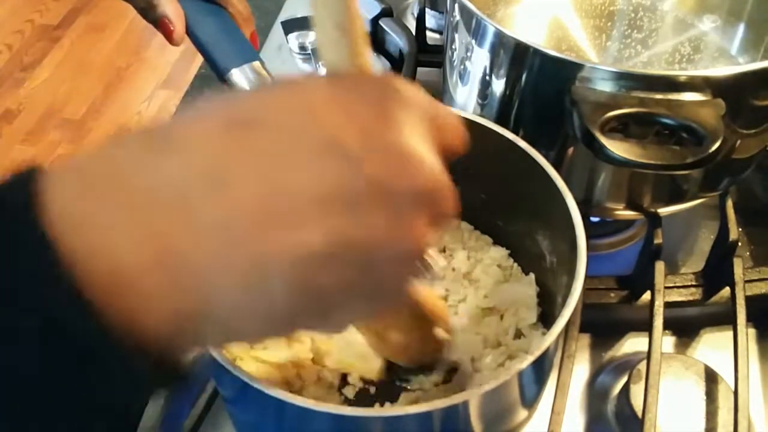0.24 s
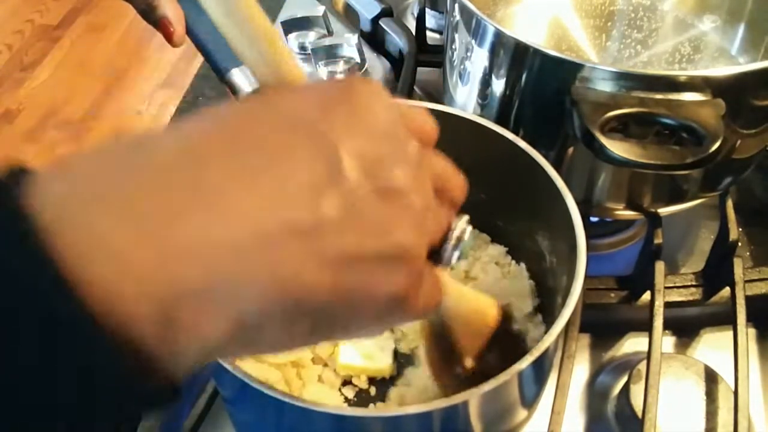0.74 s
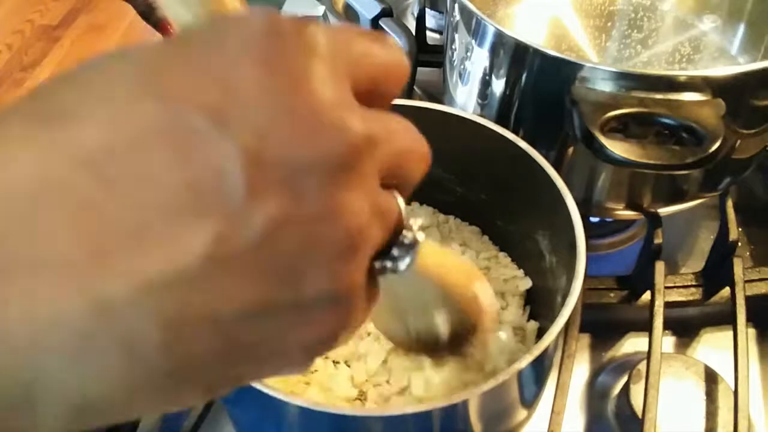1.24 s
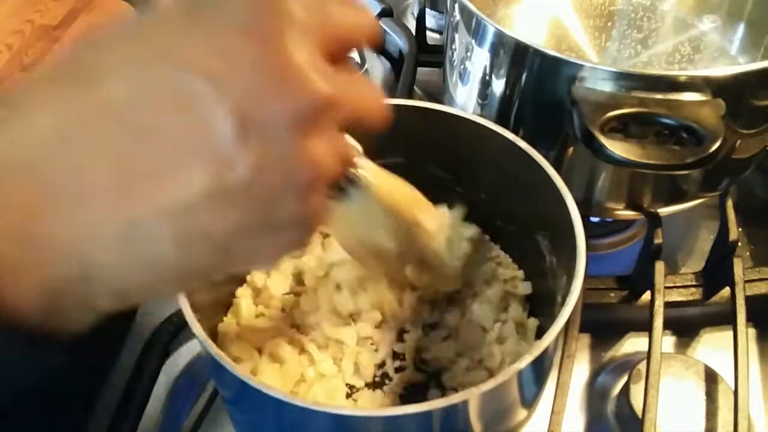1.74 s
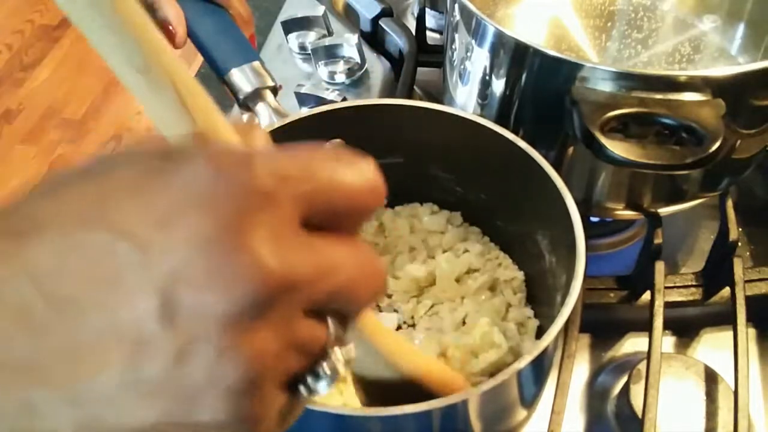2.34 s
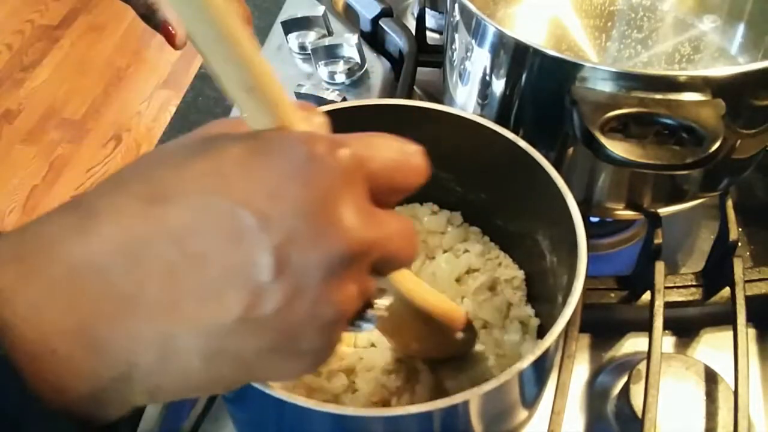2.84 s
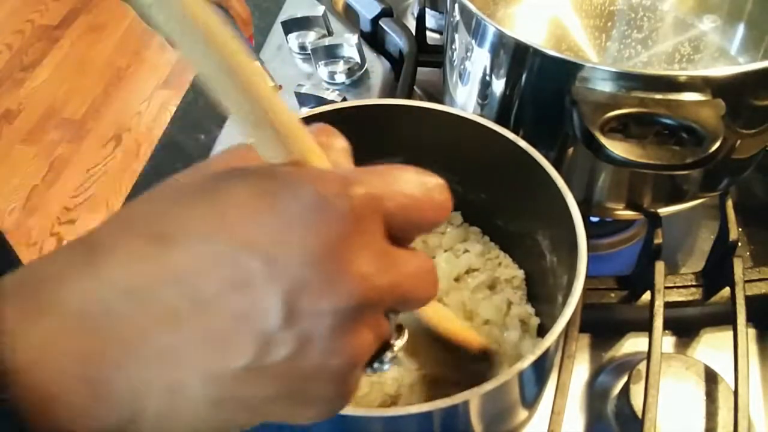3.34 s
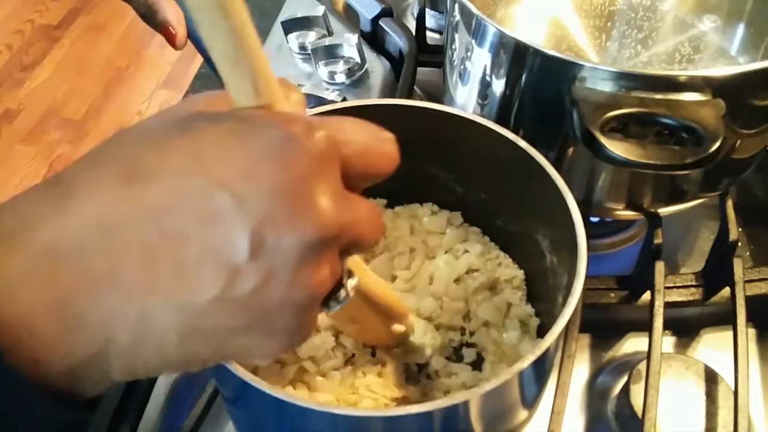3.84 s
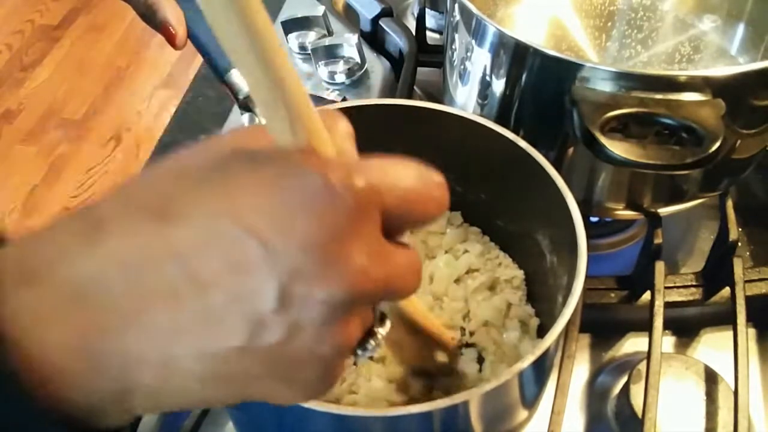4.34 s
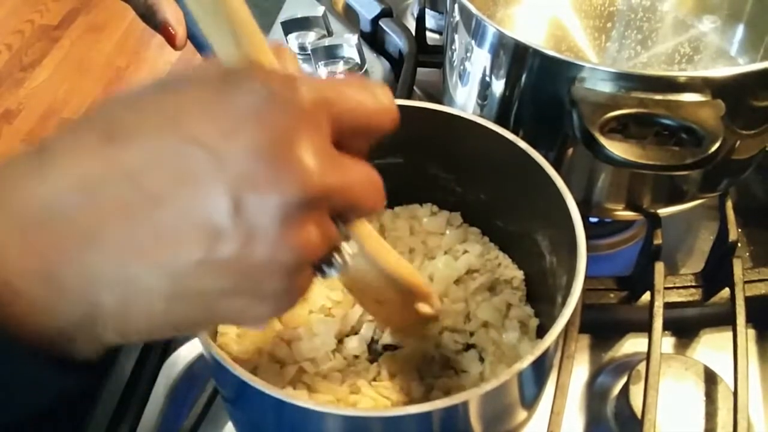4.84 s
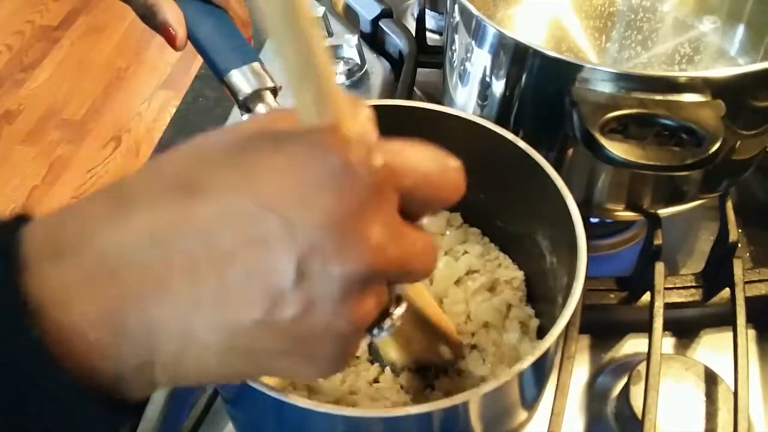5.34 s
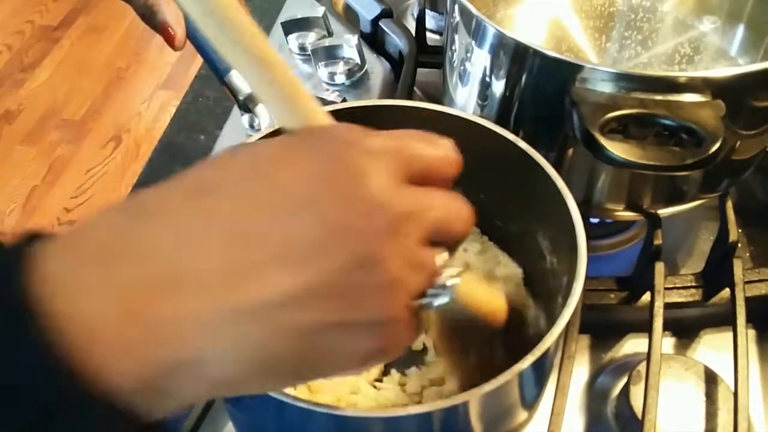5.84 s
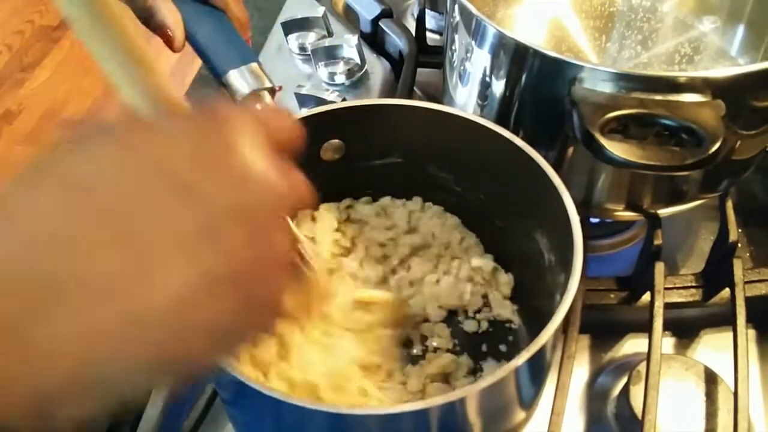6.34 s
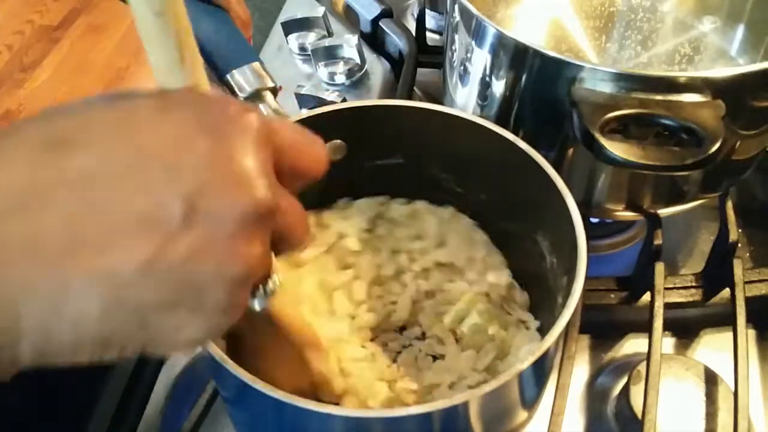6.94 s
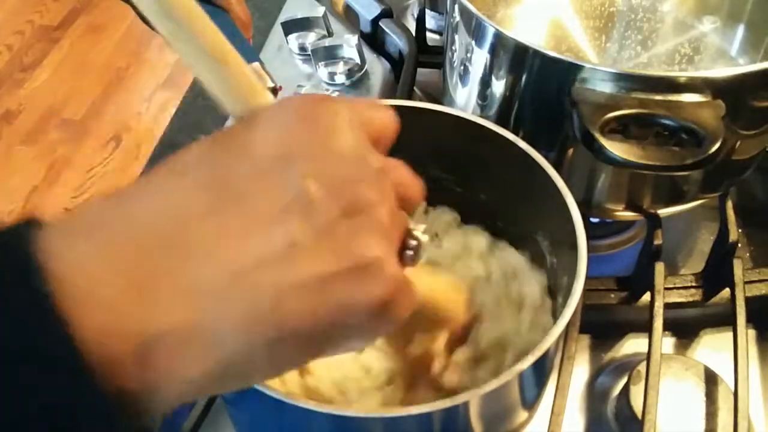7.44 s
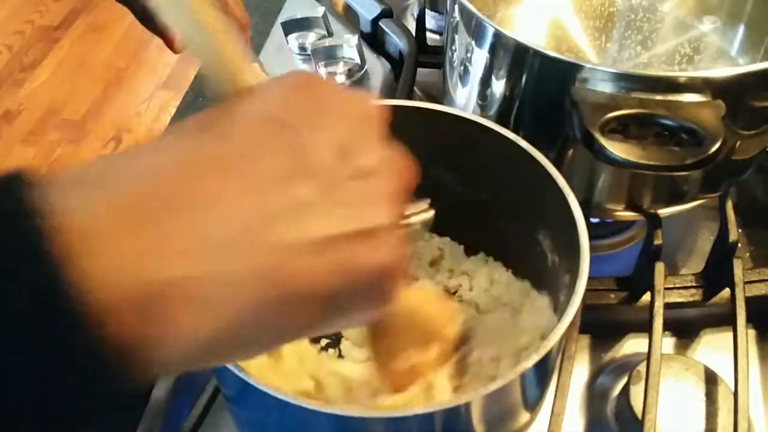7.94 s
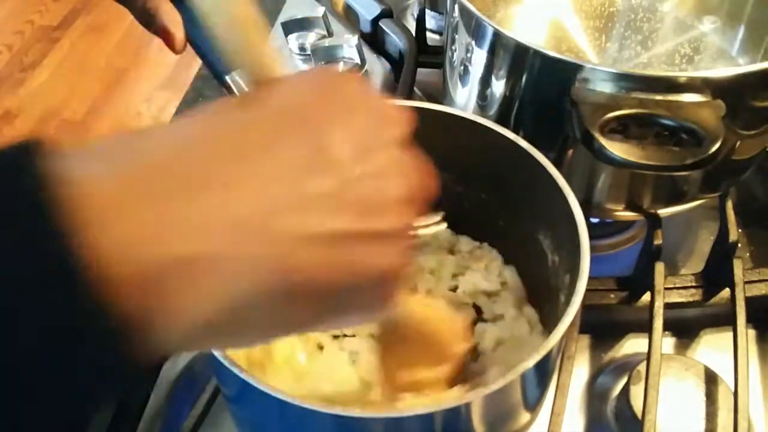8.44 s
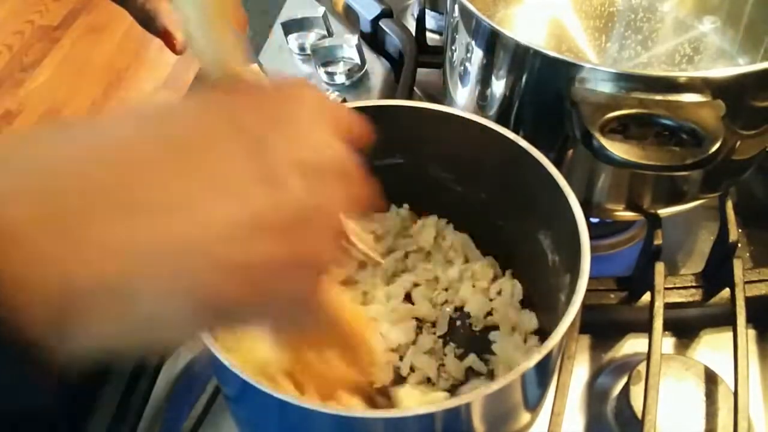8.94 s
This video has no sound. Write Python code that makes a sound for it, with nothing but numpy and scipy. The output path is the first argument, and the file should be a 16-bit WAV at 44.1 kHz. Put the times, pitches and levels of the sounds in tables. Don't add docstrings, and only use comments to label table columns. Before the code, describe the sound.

Close stereo over a saucepan on a gas stove in a small kitchen. A wooden spoon drags lightly through thick frying food with a hard early knock and spitting fat. From about 2.5 to 6 seconds, irregular firm blows clunk on the damped pan, echoing briefly off near walls. Then long scraping strokes turn the food and the sizzle swells, over steady low burner rumble.

```python
import sys
import numpy as np
from scipy import signal
from scipy.io import wavfile
from scipy.ndimage import uniform_filter1d

SR = 44100
rng = np.random.default_rng(int(sys.argv[2]) if len(sys.argv) > 2 else 0)


def to_wav(s):
    ch = np.atleast_2d(s).T
    pcm = np.round(np.clip(ch, -1, 1) * 32767)
    wavfile.write(sys.argv[1], SR, pcm.astype(np.int16))


def ratio_of_db(decibels):
    return 10 ** (np.asarray(decibels, float) / 20)


N = 404838
SWELL_STEP = 32


def evened(x):
    return x / np.sqrt(np.mean(x ** 2) + 1e-20)


def wander(samples, shape=N):
    return evened(uniform_filter1d(rng.standard_normal(shape), samples))


def read(points, hz):
    f, value = np.transpose(points)
    return np.interp(np.log(hz + 1), np.log(f + 1), value)


def curve(rows):
    s, *columns = np.transpose(rows)
    return np.array([np.interp(np.arange(N) / SR, s, c) for c in columns])


def coloured(x, points):
    log_gain = np.log(ratio_of_db(read(points, abs(np.fft.fftfreq(4096, 1 / SR)))))
    taps = np.fft.ifft(np.exp(np.conj(signal.hilbert(log_gain)))).real[:2048]
    return signal.oaconvolve(x, taps / np.linalg.norm(taps))[:N]


def grains(per_s, spread_db):
    size_db = spread_db * np.minimum(rng.exponential(1, N), 4)
    size = ratio_of_db(size_db) * rng.choice([-1., 1.], N)
    return evened(size * (rng.random(N) < per_s / SR))


def patches_of(noise, bins):
    return evened(uniform_filter1d(uniform_filter1d(noise, 6, 0), bins, 1))


def patchy(patchy_db):
    a, b, patches = rng.standard_normal((N // 128 + 5, 257, 3)).T
    z = (a + 1j * b) * ratio_of_db(patchy_db * patches_of(patches, 16))
    return evened(signal.istft(z, nperseg=512, noverlap=384)[1][:N])


def swells(s, rise, fall):
    s, rise, fall = [np.reshape(column, (-1, 1)) for column in (s, rise, fall)]
    late = np.arange(0, N + SWELL_STEP, SWELL_STEP) / SR - s
    return -15.5 * np.where(late < 0, -late / rise, late / fall) ** 1.3


def summed(below_db, top_db):
    power = ratio_of_db(below_db + np.reshape(top_db, (-1, 1))) ** 2
    return np.repeat(np.sqrt(power.sum(0)), SWELL_STEP)[:N]


# (frequency [Hz], level [dB per Hz])
HUM = [(15, -41), (25, 12.5), (48, 2.5), (113, 0.5), (235, -13.5), (262, -18), (342, -8.5), (408, -18),
       (499, -11), (665, -7.5), (711, -7), (907, -18), (1610, -26.5), (1890, -27), (5000, -31), (6500, -29),
       (11000, -120)]
# (frequency [Hz], left-right likeness [-1 to 1])
LIKENESS = [(60, 0.94), (180, 0.83), (550, 0.19), (1650, -0.3), (4970, 0.067), (15000, -0.01)]
# (time [s], rise [s], fall [s], drone level [dB])
FLARES = [
    (.89, .9, 0.096, -48),
    (2.91, 3.2, 0.13, -55.5),
    (4.42, 0.066, 0.29, -61),
    (5.498, 0.037, 0.35, -47),
    (6.5, 0.68, 0.53, -44),
    (7.8, 1.7, 1.6, -51.5),
]


def burner_and_kitchen():
    frames, hz = N // 512 + 5, np.fft.rfftfreq(2048, 1 / SR)
    a, b, c, d, patches = rng.standard_normal((frames, 1025, 5)).T
    same = np.clip(read(LIKENESS, hz), -1, 1)[:, None]
    left = a + 1j * b
    z = np.array([left, same * left + np.sqrt(1 - same ** 2) * (c + 1j * d)])
    z *= ratio_of_db(read(HUM, hz)[:, None] + 2.7 * patches_of(patches, 8))
    roar = evened(signal.istft(z, nperseg=2048, noverlap=1536)[1][:, :N])

    roar_db, drone_db, drone_hz, drone_width_hz = -51.5, -65, 65.3, 11
    s, rise, fall, db = np.transpose(FLARES)
    flare = np.hypot(1, summed(swells(s, rise, fall), db - drone_db))
    pole = np.exp((2j * np.pi * drone_hz - np.pi * drone_width_hz) / SR)
    drone = evened(signal.lfilter([1], np.poly([pole, pole]), rng.standard_normal(N)).real)
    flame = ratio_of_db(roar_db) * flare ** 0.078 * roar + ratio_of_db(drone_db - 3.0) * flare * drone
    return ratio_of_db([[1.5], [0]]) * flame


# (time [s], rise [s], fall [s], level [dB], pitch [Hz], sag [Hz per s])
RINGS = [
    (0.82, .1, 0.4, -51, 735, 92.5),
    (0.75, .25, .25, -61, 850, -20),
    (1.3, 0.17, 0.18, -63, 800, 6),
    (2.1, 0.45, 0.42, -64.5, 718, -6.5),
    (1.35, 0.36, 0.36, -66.5, 338, 5.5),
    (3.3, 0.33, .2, -69, 310, 3),
    (2.72, 0.17, .12, -64, 356, 30),
]


def singing_stove():
    s, rise, fall, db, hz, sag = np.transpose(RINGS)[:, :, None]
    late = np.arange(N) / SR - s
    gain = np.repeat(ratio_of_db(swells(s, rise, fall) + db), SWELL_STEP, axis=1)[:, :N]
    waver = ratio_of_db(6 * wander(1500, (len(s), N)))
    tone = np.sin(2 * np.pi * (hz * late - sag * late ** 2 / 2))
    return np.sqrt(2) * (gain * waver * tone).sum(0)


# (frequency [Hz], width [Hz], level [dB])
POT = [(1385, 87, -15), (2270, 210, -16), (2630, 110, -6), (3030, 150, -12.5), (3317, 120, -8),
       (3596, 52, -5), (3923, 340, -2.5), (4636, 370, -3), (5200, 250, -8), (5460, 260, -6),
       (5840, 250, -38), (6407, 114, 2.5), (6660, 47, 4.5), (6780, 60, 3)]


def pot(x):
    taps = np.zeros(4096)
    for k, (hz, width, db) in enumerate(POT):
        p = np.exp((2j * np.pi * hz - np.pi * width) / SR)
        mode = signal.lfilter([(1 - abs(p)) ** 2], np.poly([p, p]), signal.unit_impulse(4096)).real
        taps += (-1) ** k * ratio_of_db(db) * mode
    return ratio_of_db(5) * signal.oaconvolve(x, taps)[:N]


# (time [s], sizzle level [dB], top treble [dB])
HEAT = [(0, -52.5, 6), (.46, -54.5, 6.5), (1.1, -51.5, 7.5), (1.5, -49.5, 0), (1.84, -53.5, 17),
        (2.02, -52, 9), (2.22, -59, -1), (2.7, -57, 0), (3.22, -60, 4.5), (3.45, -52.5, 5), (4.2, -53, 2.5),
        (5.06, -52.5, 9), (5.63, -53, 8.5), (6.2, -52, 5.5), (7.3, -45, -0.5), (7.6, -65, -4),
        (8.3, -43.5, 1), (9.18, -44.5, -1)]
# (time [s], rise [s], fall [s], sizzle level [dB], slosh level [dB])
TURNS = [(.23, 0.17, 0.18, -53, -55), (.84, 0.19, 0.058, -45, -43.5), (1.2, 0.08, 0.026, -45.5, -48),
         (1.69, 0.29, 0.024, -50, -48), (2.07, 0.065, 0.19, -48.5, -51), (2.561, 0.014, 0.045, -46, -40),
         (2.89, 0.077, 0.07, -48.5, -58), (2.99, 0.089, 0.032, -50.5, -49), (3.37, 0.068, 0.15, -52.5, -52),
         (4.239, 0.014, 0.18, -48, -58.5), (4.52, 0.02, 0.033, -52, -71), (4.65, 0.057, 0.094, -51, -57),
         (5.089, 0.017, 0.011, -44, -57), (5.16, .05, .15, -47.5, -56), (5.471, 0.0071, .08, -55, -52),
         (6.03, 0.17, 0.088, -41, -43), (6.49, 0.15, 0.053, -40, -43), (6.67, 0.15, 0.04, -44, -46.5),
         (7.21, 0.61, 0.39, -37, -43.5), (7.44, 0.79, 0.17, -37, -43.5), (7.898, 0.5, 0.22, -37.5, -43),
         (8.13, 0.091, 0.012, -41.5, -54), (8.42, 0.38, 0.52, -42.5, -44.5),
         (8.85, 0.16, 0.83, -39.5, -43.5)]
# (time [s], peak level [dB])
SPITS = [(0.021, -28), (0.046, -34), (0.134, -38), (0.4765, -41), (1.61, -36), (1.806, -41), (1.822, -42),
         (1.843, -42), (1.905, -51), (1.941, -37), (2.5554, -27), (2.8838, -39), (3.276, -39),
         (3.7315, -44), (4.5184, -29.5), (5.7653, -45), (3.6047, -39), (3.878, -33), (4.039, -32.5),
         (4.06, -37), (4.233, -32), (4.2676, -30), (4.471, -40), (4.504, -33.5), (4.601, -34), (4.795, -39),
         (5.0735, -31), (5.259, -35), (5.273, -33), (5.3654, -32), (5.465, -34), (5.8648, -34),
         (6.3036, -32), (6.6174, -26), (6.6608, -43), (6.8183, -30), (6.841, -30), (6.983, -23),
         (8.917, -24.5)]
# (frequency [Hz], level [dB])
LEFT_PORT = [(1500, -40), (3300, -30), (5000, -19.5), (6800, -14.5), (8200, -9.5), (9000, -19), (10000, -1),
             (11000, 5.5), (12000, -5.5), (13500, -5), (14800, -12), (16000, -4.5)]
# (frequency [Hz], level [dB])
RIGHT_PORT = [(1500, -27), (3300, -26.5), (5000, -17), (6000, -12.5), (7100, -2.5), (8000, -3), (8700, -17),
              (9200, -21), (10000, -50), (12000, -21.5), (14500, -23), (16000, -14)]


def frying():
    wet_db, drag_db = -21.5, -10.5
    heat_db, treble_db = curve(HEAT)
    heat = ratio_of_db(heat_db)
    s, rise, fall, fizz_db, slosh_db = np.transpose(TURNS)
    turned = swells(s, rise, fall)
    sizzle = np.hypot(heat, summed(turned, fizz_db))
    wet = np.hypot(ratio_of_db(wet_db) * heat, summed(turned, slosh_db))
    s, rise, fall, db = np.transpose(STROKES)[:4]
    wet = np.hypot(wet, summed(swells(s, rise, fall), db + drag_db))
    flicker = ratio_of_db(0.95 * wander(300))

    s, db = np.transpose(SPITS)
    spits = np.zeros(N)
    spits[np.round(s * SR).astype(int)] = ratio_of_db(db - 6.5)
    t = np.arange(600) / SR
    spit_fall = ratio_of_db(-60 * t / 0.035)

    crackle = grains(300, 4.4)
    out = []
    for port, port_db in ((LEFT_PORT, 5), (RIGHT_PORT, -3)):
        fizz = sizzle * flicker * (patchy(2.4) + 0.29 * crackle)
        burst = signal.oaconvolve(spits, rng.standard_normal(len(t)) * spit_fall)[:N]
        slosh = ratio_of_db(0.5) * wet * flicker * patchy(4.2)
        out.append(ratio_of_db(port_db) * coloured(fizz + burst, port) + ratio_of_db(8) * pot(slosh))
    highpass = signal.butter(N=3, Wn=12200, btype="high", fs=SR, output="sos")
    top = signal.sosfiltfilt(highpass, out)
    return out + (ratio_of_db(treble_db) - 1) * top


def rung(modes, at, pushes, rise_s):
    skirt_low, skirt_high = 0.54, 2.64
    out = np.zeros((2, N))
    for (hz, db, t60, lr_db, lead), push in zip(modes, pushes):
        fall = np.exp((2j * np.pi * hz - np.log(1000) / t60) / SR)
        rise = np.exp((2j * np.pi * hz - hz / 600 / rise_s) / SR)
        band = signal.butter(N=2, Wn=[skirt_low * hz, skirt_high * hz], btype="band", fs=SR, output="sos")
        force = signal.sosfilt(band, np.bincount(at, push, N))
        gain = ratio_of_db(db) * (1 - abs(rise)) ** 2
        ring = signal.lfilter([1j * gain], np.poly([fall, rise, rise]), force)
        port = ratio_of_db(lr_db / 2) * np.exp(.5j * lead)
        out += (ring * port ** np.array([[1], [-1]])).real
    return out


ZONES_HZ = [
    250,
    600,
    930,
    1800,
]


def zone_db(hz, thud_db, wall_db, rim_db):
    share = [np.interp(np.log(hz), np.log(ZONES_HZ), row) for row in np.eye(4)]
    return share[0] * thud_db + share[2] * wall_db + share[3] * rim_db


# (time of top [s], rise [s], fall [s], pressure [dB], wall against base [dB])
STROKES = [(0.225, 0.033, 0.041, -41, -7), (0.819, 0.055, 0.022, -36, -1.5), (1.165, 0.018, 0.054, -41, -8),
           (1.658, 0.1, 0.1, -53.5, 1.5), (2.08, 0.071, 0.12, -53, 1), (2.9, 0.079, 0.022, -48, -2),
           (2.991, 0.046, 0.0077, -44, -2.5), (5.964, 0.0083, 0.034, -29, -10), (6.49, 0.1, 0.05, -50, 3),
           (7.08, 0.053, 0.19, -37, -5.5), (7.185, 0.19, 0.062, -35.5, -3.5),
           (7.39, 0.071, 0.083, -41, 0.5), (7.455, 0.077, 0.028, -39.5, 3), (7.629, 0.092, 0.081, -39, 5.5),
           (7.884, 0.19, 0.029, -39.5, 0), (8.108, 0.051, 0.084, -30, -4.5), (8.313, 0.069, 0.044, -35, -3),
           (8.585, 0.097, 0.12, -38, 0), (8.801, 0.068, 0.08, -38, 2), (8.844, 0.086, 0.037, -34.5, -10),
           (9.04, 0.097, 0.097, -37, -4), (9.131, 0.11, 0.04, -38, -4)]


def scrapes():
    s, rise, fall, db, wall_db = np.transpose(STROKES)
    below_db = swells(s, rise, fall)
    now = np.argmax(below_db + db[:, None], 0)
    eased_db = np.minimum(-below_db[now, np.arange(len(now))], 30)
    rim_db = np.repeat(-6 + 0.93 * wall_db[now] + 0.27 * eased_db, SWELL_STEP)
    wall_db = np.repeat(wall_db[now], SWELL_STEP)
    judder = ratio_of_db(2.56 * wander(500))
    clicks = grains(1500, 3.7)
    at = np.flatnonzero(clicks)
    slips = (ratio_of_db(-32.5) * summed(below_db, db) * judder * clicks)[at]
    pushes = []
    for hz, *_ in PAN:
        signs = rng.choice([-1., 1.], len(at))
        pushes.append(slips * (.5 + signs) * ratio_of_db(zone_db(hz, -14.0, wall_db[at], rim_db[at])))
    return at / SR, pushes


# (time [s], peak level [dB], thud [dB], wall [dB], rim [dB]), zones against the base
BLOWS = [(0.587, -18.5, 6.5, -29, -34), (0.746, -8, -11, -1, -29.5), (2.518, -17, -8, -22, -31),
         (2.532, -21, -9, -21, -26), (2.556, -23.5, -29, 0.5, -5.5), (2.805, -22.5, -0.5, -41, -26),
         (3.395, -10.5, -76, -7.5, -46), (3.881, -26, -61, -2.5, -17.5), (4.24, -23, 3.5, -31, -25),
         (4.281, -6, -61, -11, -38), (4.651, -7, -53, -11, -32.5), (5.083, -5, -74, -5, -23.5),
         (5.476, -9.5, -17.5, -5.5, -23), (5.716, -20.5, 6, -36, -43), (5.846, -20, 3, -28, -28),
         (5.929, -13, -11.5, 0, -10.5), (6.737, -24, 0, -61, -33), (8.049, -24.5, -47, -9.5, -35),
         (9.117, -28.5, -41, -8.5, -25)]
# (time [s], peak level [dB], thud [dB], wall [dB]), zones against the base
TAPS = [(0.021, -37.5, -31, -3.5), (0.553, -33.5, 3, -24), (1.43, -30.5, -7.5, -12),
        (2.821, -24.5, 5.5, -19), (3.308, -41, 2.5, -21), (3.503, -28, -6, -3.5), (3.512, -29.5, -9, -2),
        (3.67, -35, -4.5, -38), (2.99, -44.5, -22, -1), (3.859, -31, -8, -15), (4.604, -42, 2, -3.5),
        (5.462, -33, -35, -14), (5.746, -23, -4.5, -45), (6.263, -42, -12, -36), (7.161, -30.5, -31, -27),
        (7.37, -39, -28, 6), (7.445, -34, -18, -24), (8.29, -30, -35, 1), (7.052, -35.5, -22, -17),
        (7.211, -43, -16, -18), (7.595, -39, -27, 5), (7.635, -35, -1, -7), (7.835, -40.5, -18, 1),
        (8.109, -32, -23, -9), (8.203, -39, -22, -8), (8.273, -44, -18, 0.5), (8.533, -38.5, -18, -2),
        (8.57, -34, -17, -11), (8.773, -39, -22, 2), (8.796, -32, -19, 0), (8.83, -30, -19, -0.5),
        (9.021, -31.5, -20, -1.5), (9.101, -30.5, -19, -4), (4.271, -33, -20, 0)]


def touches():
    taps = [row + (-16.5 + 0.97 * row[3],) for row in TAPS]
    return np.transpose(BLOWS + taps)


# (lateness [s], share of the push)
SQUASH = [
    (-.003, 0.22),
    (-.0012, 0.38),
    (0, .3),
    (.0035, 0.19),
]


def knocks(modes):
    s, db, *zones = touches()
    spot_db = 2 * rng.standard_normal((len(s), len(modes)))
    share = np.transpose(SQUASH)[1][:, None]
    return [(share * ratio_of_db(db + zone_db(mode[0], *zones) + spot_db[:, k])).ravel()
            for k, mode in enumerate(modes)]


# (frequency [Hz], level [dB], t60 [s], left-right [dB], left phase lead [rad])
PAN = [(187.4, -3.5, 0.069, 2, .1), (324, 0.5, 0.06, 3, 0.18), (396.7, -3.5, 0.12, 0.5, 0.22),
       (562, 1.5, 0.12, -3, 0.45), (606, 5.5, 0.044, 12, 1.11), (683.5, -3.5, 0.11, 16, 3.05),
       (730, -2, 0.053, -12, 1.1), (792, -8, 0.18, 19, 2), (883.7, 9.5, 0.058, -0.5, 0.67),
       (937, -18.5, 0.08, -35, 4.9), (1735, 2, 0.029, 2.5, 0.56), (1780, 4, 0.014, -6, 3.95),
       (2790, -6, 0.017, 15.5, 0.67)]
# (frequency [Hz], level [dB], t60 [s], left-right [dB], left phase lead [rad])
SPOON = [(274, -5, 0.042, 2, 0.16), (431.7, -2, 0.016, 5, 0.52), (613, 2.5, 0.014, 1.5, 0.74),
         (740, 4, 0.013, 3, 0.65), (1094, 2, 0.029, 3.5, 0.61), (1200, -29, 0.02, -7, 0.91),
         (1305, 1, 0.02, 0, 0.76), (1532, 3, 0.018, 2, 1.2), (1830, 7, 0.018, -3, 0.34),
         (2130, 0, 0.014, 5, 1.55), (2890, -0.5, 0.006, -7.5, 3.4), (4500, 4, 0.0017, 1, 2)]
# (frequency [Hz], level [dB], t60 [s], left-right [dB], left phase lead [rad])
TICK = [
    (886, 7, .01, 3, 0.71),
    (1310, -5, .015, -3, .7),
    (1730, -3.5, 0.025, 2, 1.3),
    (3860, -18, .008, -7, 1.5),
]
# (frequency [Hz], level [dB], t60 [s], left-right [dB], left phase lead [rad])
GRATE = [
    (124.5, -33.5, 0.18, -2, .05),
    (176, -28, 0.1, 3, .1),
]


def spoon_on_pan():
    s, db, thud_db, wall_db, rim_db = touches()
    late, share = np.transpose(SQUASH)
    tick = rung(TICK, np.round(s * SR).astype(int), [ratio_of_db(db + rim_db)] * len(TICK), rise_s=0.0004)
    ring_db = -4 - 0.81 * np.maximum(db + 16.5, 0)
    on_wall = np.clip((wall_db + 5) / 5, 0, 1)
    soft = np.clip((thud_db + 12) / 12, 0, 1.5)
    lead_s = .0007
    s = (s - lead_s + late[:, None] * soft).ravel()
    slip_s, slips = scrapes()
    at = np.round(np.r_[s, slip_s] * SR).astype(int)
    blow_at = at[:len(s)]

    ring = np.tile(ratio_of_db(ring_db - 4 + 2.5 * on_wall), len(SQUASH))
    pushes = [np.r_[ring * blow, slip] for blow, slip in zip(knocks(PAN), slips)]
    pan = rung(PAN, at, pushes, rise_s=0.001)
    held = np.tile(ratio_of_db(-11 * on_wall), len(SQUASH))
    wood = rung(SPOON, blow_at, held * knocks(SPOON), rise_s=.00058)
    jolt = np.outer(share, ratio_of_db(db)).ravel()
    grate = rung(GRATE, blow_at, [jolt] * len(GRATE), rise_s=0.0036)
    return pan + ratio_of_db(2.0) * wood + tick + grate


# (delay [s], left level [dB], right level [dB])
ECHOES = [
    (.0135, -16, -17.5),
    (.017, -18, -18),
    (.029, -19, -19),
    (.044, -26, -23),
    (.066, -19.5, -19.5),
    (.072, -24, -23.5),
]


def echoes(x):
    out = np.zeros_like(x)
    for k, (s, *db) in enumerate(ECHOES):
        late = round(s * SR)
        out[:, late:] += (-1) ** k * ratio_of_db(np.array(db))[:, None] * x[::-1, :-late]
    return out


# (frequency [Hz], t60 [s])
KITCHEN = [
    (200, 0.47),
    (660, 0.36),
    (1740, 0.31),
    (5000, 0.19),
]


def kitchen(x):
    taps = np.zeros((2, SR // 2))
    slots = np.arange(400, SR // 2 - 20, 20)
    at = slots + rng.integers(0, 20, (2, len(slots)))
    np.put_along_axis(taps, at, rng.choice([-1., 1.], at.shape), 1)
    hz, t, z = signal.stft(taps, SR, nperseg=256)
    same = np.clip(read(LIKENESS, hz), 0, 1)[:, None]
    z = np.array([z[0], same * z[0] + np.sqrt(1 - same ** 2) * z[1]])
    decay = ratio_of_db(-60 * t / read(KITCHEN, hz)[:, None])
    tail = signal.istft(z * decay, SR, nperseg=256)[1]
    return signal.fftconvolve(x, tail / np.linalg.norm(tail[0]), axes=1)[:, :N]


def scene():
    near = spoon_on_pan()
    room = echoes(near) + ratio_of_db(-10) * kitchen(near)
    return near + room + frying() + burner_and_kitchen() + singing_stove()


def roll_off(x):
    return signal.sosfilt(signal.butter(12, 15870, fs=SR, output="sos"), x)


def record(dry):
    cut = signal.sosfilt(signal.butter(3, 37, "high", fs=SR, output="sos"), dry)
    limited = cut / (1 + abs(cut / .9) ** 6) ** (1 / 6)
    edge = signal.firwin(1023, 15780, window=("kaiser", 9), fs=SR)
    mix = signal.oaconvolve(limited, edge[None], "same")
    return roll_off(mix)


dry = scene()
out = record(dry)
to_wav(out)
```